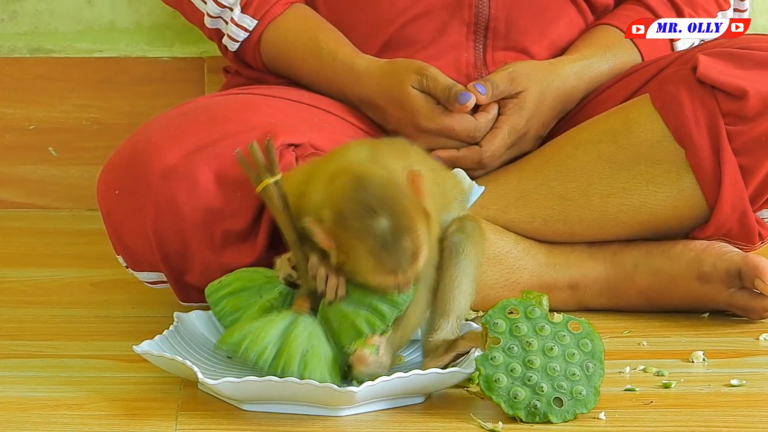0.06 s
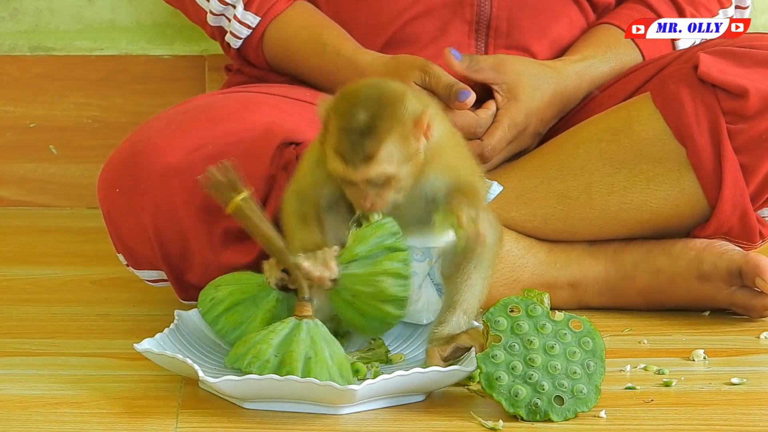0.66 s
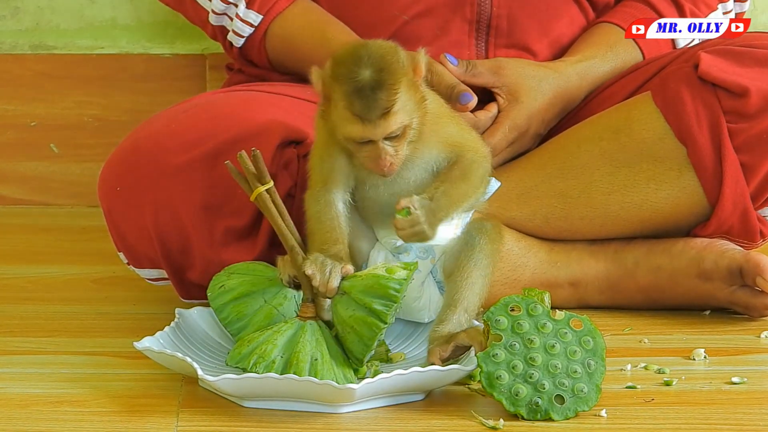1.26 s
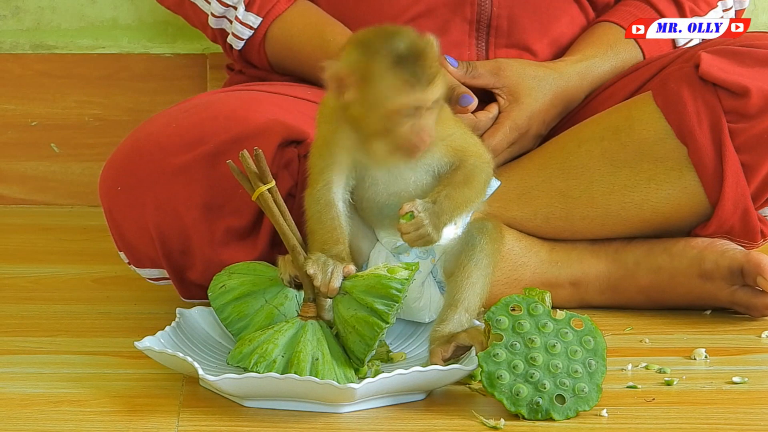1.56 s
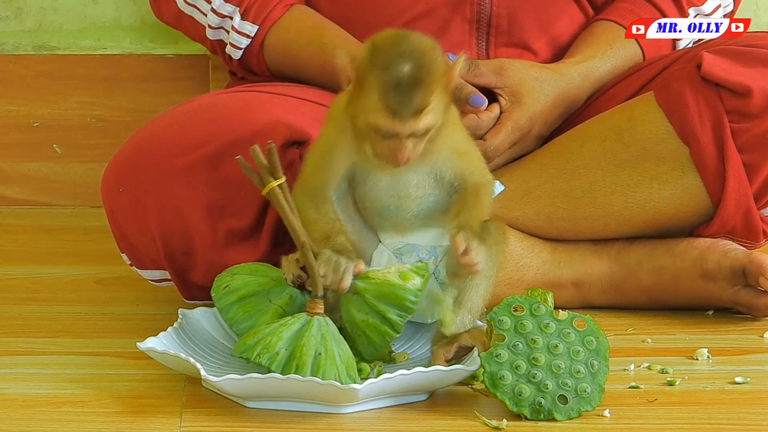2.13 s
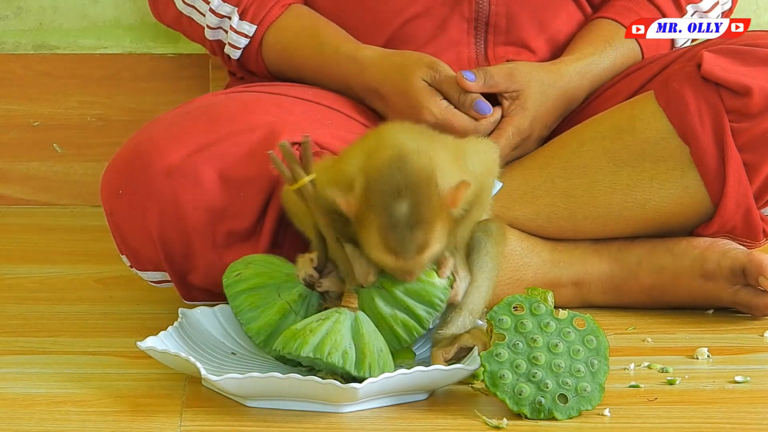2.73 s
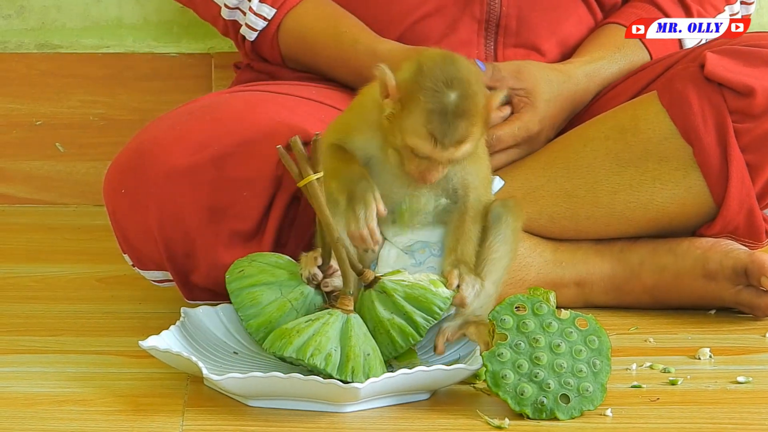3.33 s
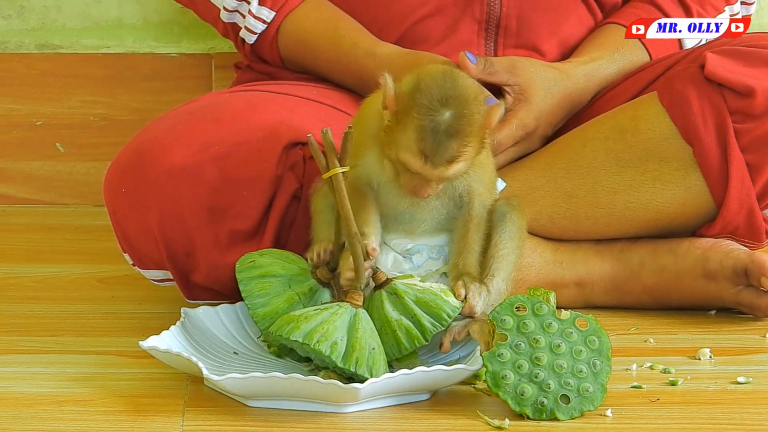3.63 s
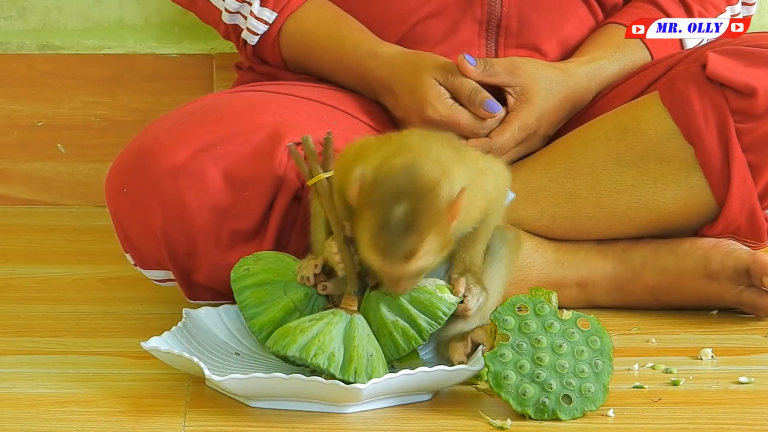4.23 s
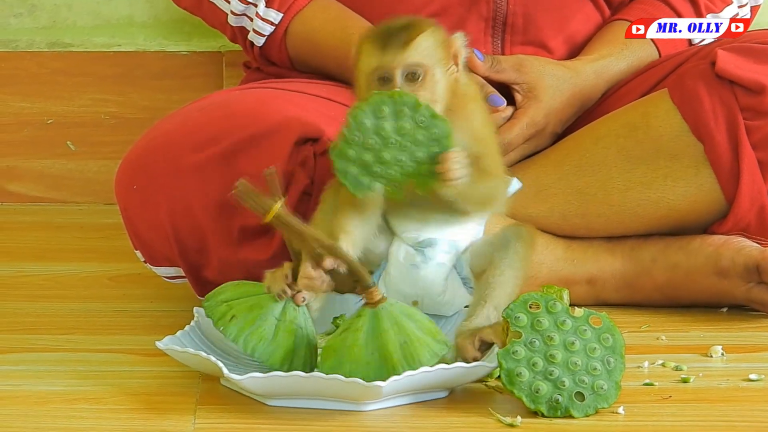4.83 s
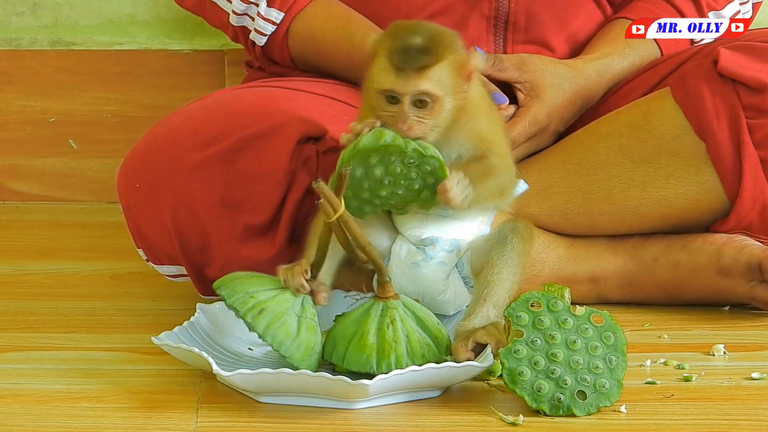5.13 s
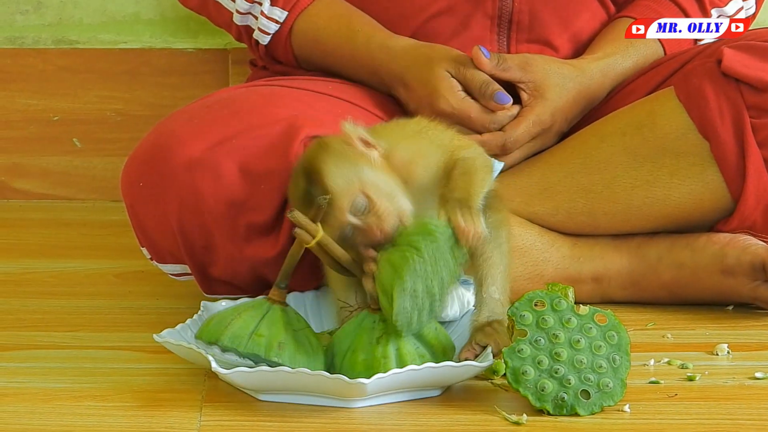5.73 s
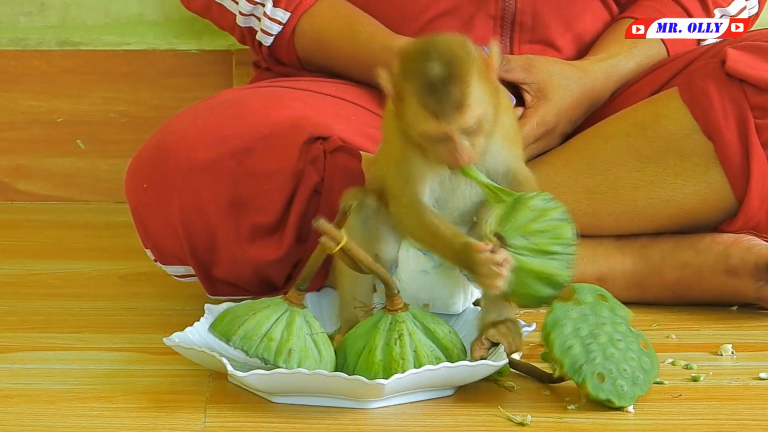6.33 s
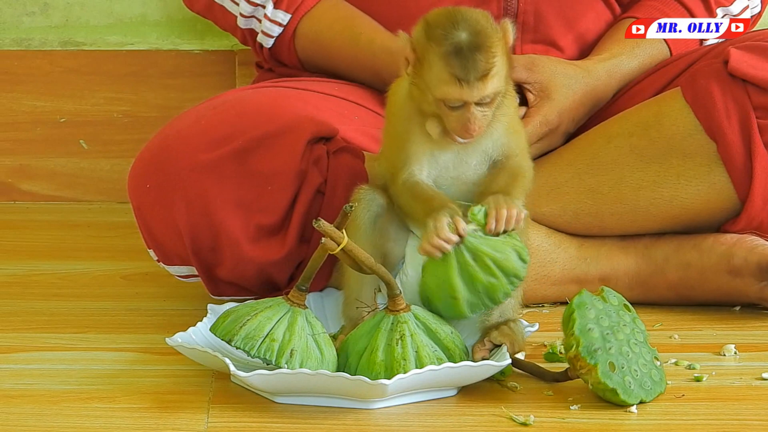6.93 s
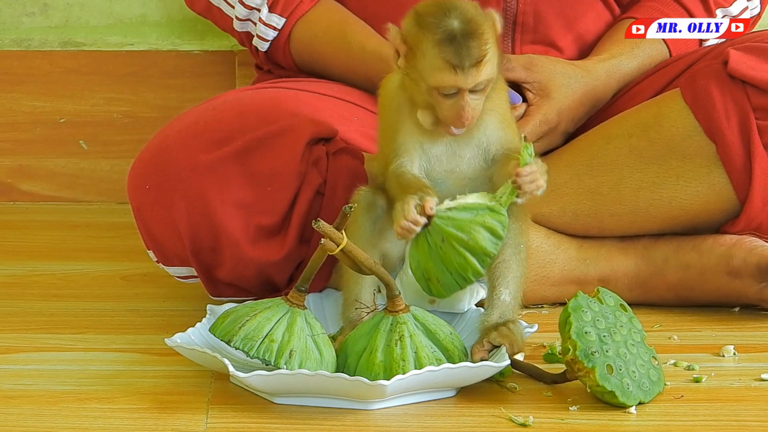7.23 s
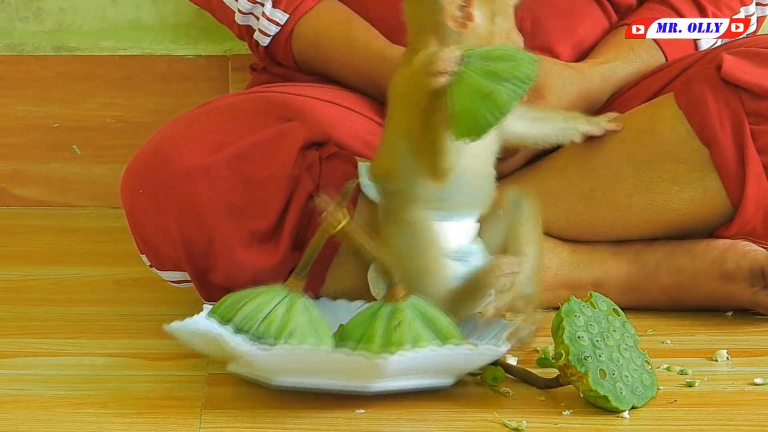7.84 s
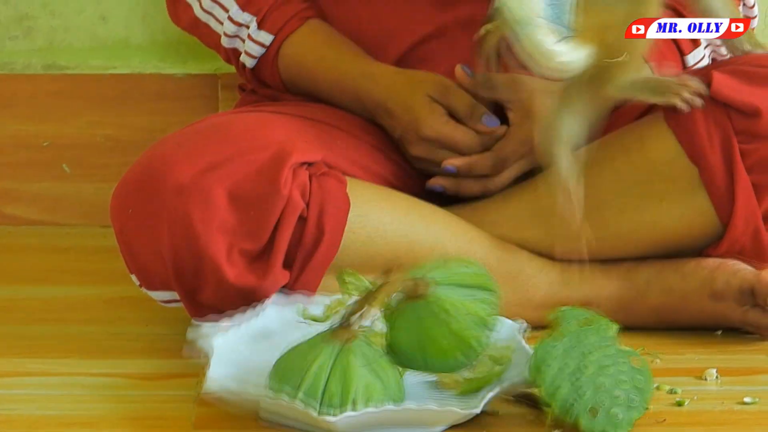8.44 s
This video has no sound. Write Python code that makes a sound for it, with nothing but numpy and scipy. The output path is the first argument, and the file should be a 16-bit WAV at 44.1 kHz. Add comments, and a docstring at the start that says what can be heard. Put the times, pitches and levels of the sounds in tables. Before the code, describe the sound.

A soft, steady rush fills a bare room, and every contact leaves a short echo. In the first second, seed pod husks snap and tear in small, crisp ticks, with light scrapes and taps of a hard plate on a wooden floor. After a pause, a knock and snap come at 2.3 seconds, and more tearing and tapping around 3. From 4.5 to 5.7 seconds pods drag, husks crack and the plate knocks several times. Louder snaps at 6.2 lead to a scrape and a firm knock at 6.4. Very faint, distant hoots fall slightly in pitch near 3.7 and 7 seconds. Light sliding follows, then the tipped plate is struck with a sharp, ringing clack at 8.2. It knocks, scrapes and lands with the loudest crack at 8.5 seconds, and the volume dips slightly afterwards.

```python
"""Monkey with seed pods on a plate

A small monkey tugs and bites at green seed pods on a hard plate, in a bare room with a wooden floor.
Husks snap and tear, pods drag, and the plate rocks and knocks on the boards. At last it tips up, is
struck while off the floor, and falls back. The room echoes, with a soft rush and faint, far-off hoots.
An automatic volume control turns the sound down after the loudest knocks and slowly recovers."""
import sys
import numpy as np
from scipy import signal
from scipy.fft import rfft, irfft, next_fast_len
from scipy.io import wavfile
from scipy.ndimage import uniform_filter1d

SR = 44100
rng = np.random.default_rng(int(sys.argv[2]) if len(sys.argv) > 2 else 0)


def transcribe(u):
    """Save the signal u as a 16-bit wav file named by the first command-line argument.

    u: samples, shape (n,) or (channels, n), limited to [-1, 1]; the rate is SR.
    q: integer samples, one column per channel.
    """
    v = np.clip(np.atleast_2d(u).T, -1, 1)
    q = np.round(v * 32767).astype(np.int16)
    wavfile.write(sys.argv[1], SR, q)


N = 378378

# The steady background rush, from bass to treble: pitch_hz, level_db
AIR_SPECTRUM = [(15, -56), (25, -37), (86, -9), (126, -13.5), (253, -4.5), (368, -6.5), (509, -6),
                (684, -7), (741, -6.5), (1240, -6.5), (1800, -9), (2920, -14.5), (6380, -17.5),
                (15500, -23)]
# Stereo width of that rush (lower means the two sides are more alike): pitch_hz, side_db
AIR_WIDTH = [(60, -16), (380, -14), (1290, -12), (2380, -6), (4400, -3), (15000, -1)]
# Stereo width of the echo: pitch_hz, side_db
ECHO_WIDTH = [(200, -20), (700, -20), (1290, -17), (2380, -12.5), (4400, -8), (8120, -3), (15000, -35)]
# How long the echo lasts (every "fade" here is the time to drop 60 dB): pitch_hz, fade_s
ECHO_FADE = [(200, 0.47), (550, 1.19), (1400, 0.93), (3700, 0.97), (7000, 0.91), (14000, 0.52)]
# Echo strength over the direct sound, before each source's own echo_db: pitch_hz, gain_db
ECHO_GAIN = [(150, 5.5), (500, 6.5), (1400, 5), (4000, 8.5), (12000, 7.5)]
# Faint, far-off hoots: start_s, length_s, first_hz, last_hz, level_db
HOOT_CALLS = [(3.7, .45, 522, 471, -72), (6.767, 0.169, 344.5, 292.6, -62),
              (7.045, 0.23, 308.5, 290, -69.5)]
# Notes the floorboards ring at: pitch_hz, width_hz, level_db
BOARD_NOTES = [(419, 41, -3.5), (426, 12, -1), (550, 61, -13.5), (660, 18, 1.5), (754, 16.3, 3),
               (770, 76, -1)]
# Notes of the plate's body: pitch_hz, width_hz, level_db
BODY_NOTES = [(1056, 143, 1.5), (1212, 51, 1), (1300, 52, 1), (1446, 18, -3), (1640, 390, -4),
              (1765, 175, -5.5)]
# Notes of the plate's rim: pitch_hz, width_hz, level_db
RIM_NOTES = [(2087, 53, 5), (2210, 27, -10), (2553, 46, -1.5), (2930, 180, -5.5), (3210, 200, -7),
             (3254, 290, -6), (3740, 78, -24)]
# Notes of the plate when it is off the floor: pitch_hz, width_hz, level_db
LIFTED_NOTES = [(1240, 126, -10), (1400, 50, -8), (1755, 71, -0.5), (1845, 94, -7.5), (2590, 110, -16.5),
                (3500, 156, -14.5), (4180, 42, -20), (5130, 260, -24.5)]
# Crowded notes of pods and boards, blurred into noise: pitch_hz, level_db
CLATTER_SPECTRUM = [(120, -12), (250, -2), (400, -4.5), (520, -2), (1300, -3), (3400, -4), (4600, -14),
                    (9000, -43), (15000, -18)]
# The bright crack of a knock: pitch_hz, level_db
CRACK_SPECTRUM = [(300, -46), (3000, -5), (4500, -12.5), (6500, 3), (8800, 2.5), (10500, -11), (16000, -37)]
# The tone of a breaking husk: pitch_hz, level_db
HUSK_SPECTRUM = [(300, 11), (1000, 7), (3000, 3.5), (8800, 3), (10500, -1), (16000, 9)]
# Pods and plate sliding: start_s, length_s, level_db, centre_hz
SLIDES = [(0.055, 0.087, -52, 1400), (0.344, 0.12, -59, 900), (0.696, 0.028, -46.5, 1400),
          (2.746, 0.03, -53, 670), (3.061, 0.034, -45.5, 900), (4.582, 0.4, -53.5, 1000),
          (5.02, 0.026, -44.5, 685), (5.204, 0.046, -53.5, 740), (6.385, 0.093, -36.5, 930),
          (7.454, 0.096, -53, 1000), (7.952, 0.25, -58, 1000), (8.264, 0.052, -37.5, 654),
          (8.411, 0.23, -29, 890)]
# A husk snaps, then tears on: start_s, snap_level_db, tear_length_s, high_edge_hz
HUSK_BREAKS = [(0.291, -36.5, 0.13, 11000), (0.637, -41.5, 0.015, 10900), (0.71, -39, .035, 12000),
               (0.733, -30.5, 0.015, 12100), (0.989, -36, 0.045, 12000), (2.328, -37.5, .015, 8000),
               (2.834, -45.5, 0.019, 3980), (3.063, -34, 0.062, 13000), (4.732, -41.5, 0.017, 6040),
               (4.757, -33, 0.033, 10000), (4.781, -27.5, 0.014, 13000), (5.033, -31, 0.035, 5100),
               (5.49, -31.5, 0.0086, 9300), (6.185, -28.5, 0.018, 7900), (6.224, -25, 0.052, 9000),
               (6.26, -30, 0.025, 10000)]
# Plate and pods knocking: start_s, level_db, low_edge_hz, high_edge_hz
PLATE_KNOCKS = [(0.106, -50.5, 1080, 1790), (0.734, -35.5, 450, 1880), (1.047, -40, 330, 1800),
                (2.329, -31, 1000, 1620), (3.007, -45, 900, 2200), (3.173, -36.5, 422, 3500),
                (4.51, -44.5, 600, 2320), (4.782, -26, 750, 1640), (4.825, -25.5, 340, 1400),
                (4.864, -28.5, 340, 2000), (5.634, -42.5, 400, 1120), (5.679, -24, 614, 2930),
                (6.26, -21, 800, 1770), (6.429, -12.5, 800, 5200), (7.759, -46, 850, 1750),
                (8.114, -41, 1400, 2040), (8.385, -19.5, 657, 1400), (8.501, -4.5, 1300, 14700)]


def amp(db):
    """Turn decibels into a number to multiply by."""
    return 10 ** (np.asarray(db) / 20)


def unit(x):
    """Scale a sound to an average power of 1."""
    return x / np.sqrt(np.mean(x ** 2) + 1e-20)


def at_level(x, db, length_s):
    """Give x the energy of a steady sound of this level and length."""
    return amp(db) * x / np.sqrt(np.sum(x ** 2) / (length_s * SR) + 1e-20)


def fade(t, fade_s):
    """A dying away that drops 60 dB every fade_s seconds."""
    return amp(-60 * t / fade_s)


def along(curve, hz):
    """Read a value between the rows of a (pitch_hz, value) table, on a musical pitch scale."""
    pitches, values = np.transpose(curve)
    return np.interp(np.log(hz + 1), np.log(pitches), values)


def filtered(x, response):
    """Multiply each frequency f in a sound by response(f)."""
    n = x.shape[-1]
    padded = next_fast_len(n + 8192)
    return irfft(rfft(x, padded) * response(np.fft.rfftfreq(padded, 1 / SR)), padded)[..., :n]


def coloured(x, spectrum):
    """Shape a sound's bass and treble with a (pitch_hz, level_db) table."""
    return filtered(x, lambda f: amp(along(spectrum, f)))


def resonance(f, hz, width_hz):
    """One ringing note: it passes its own pitch fully and others less."""
    return 1j * f * width_hz / (hz * hz - f * f + 1j * f * width_hz)


def ringing(x, notes, scatter_db):
    """Shake an object with x; each spot touched rings its notes with new strengths and signs."""
    gains = amp(scatter_db * rng.standard_normal(len(notes))) * rng.choice([-1, 1], len(notes))
    return filtered(x, lambda f: sum(gain * amp(db) * resonance(f, hz, width_hz)
                                     for gain, (hz, width_hz, db) in zip(gains, notes)))


def contact(x, low_hz, high_hz):
    """Trim bass and treble: a heavier blow reaches lower, a harder contact higher."""
    x = signal.sosfilt(signal.butter(2, low_hz, "high", fs=SR, output="sos"), x)
    return signal.sosfilt(signal.butter(3, high_hz, fs=SR, output="sos"), x)


def burst(t, spectrum, fade_s):
    """A puff of shaped noise that dies away."""
    return coloured(rng.standard_normal(len(t)), spectrum) * fade(t, fade_s)


def slips(length_s, per_s, spread_db):
    """Sticking and slipping makes a run of tiny, uneven clicks that swells and stops."""
    n = int(length_s * SR)
    slipping = rng.random(n) < per_s / SR
    clicks = slipping * rng.standard_normal(n) * amp(spread_db * rng.standard_normal(n))
    return np.pad(clicks * np.sqrt(np.hanning(n)), (0, SR // 20))


def stereo(middle, side, width):
    """Left and right, heard from two close points: most alike in the bass."""
    side = coloured(side, width)
    return np.array([middle + side, middle - side])


def add(track, start_s, sound):
    """Mix a sound into the track at its start time."""
    i = max(round(start_s * SR), 0)
    track[..., i:i + sound.shape[-1]] += sound[..., :max(N - i, 0)]


def room_tone(level_db=-54.5):
    """A steady background rush and hiss."""
    middle, side = coloured(rng.standard_normal((2, N)), AIR_SPECTRUM)
    return amp(level_db) * stereo(unit(middle), unit(side), AIR_WIDTH)


def in_room(sound, echo_db, build_s=0.0047, near_s=0.0048, near_db=-8):
    """Add a long echo off bare walls and a few quick bounces, new for each place of contact."""
    hz, t, noise = signal.stft(rng.standard_normal((2, int(0.75 * SR))), SR, nperseg=256)
    fade_s = along(ECHO_FADE, hz)[:, None]
    gain = amp(echo_db + along(ECHO_GAIN, hz))[:, None] * np.sqrt(2 * np.log(1000) / (fade_s * SR))
    tail = signal.istft(noise * gain * fade(t, fade_s), SR, nperseg=256)[1]
    tail *= 1 - np.exp(-(np.arange(tail.shape[1]) / SR / build_s) ** 2)
    room = stereo(*tail, ECHO_WIDTH)
    room[:, 0] += 1  # the direct sound
    bounces = (near_s * SR * rng.random(size=8)).astype(int)  # off the floor and bodies close by
    room[:, bounces] += amp(near_db) * rng.choice([-1, 1], len(bounces)) / np.sqrt(len(bounces))
    return signal.fftconvolve(sound[None], room, axes=1)


def hoots():
    """Soft, slightly falling tones from far away."""
    for start_s, length_s, first_hz, last_hz, db in HOOT_CALLS:
        n = int(length_s * SR)
        phase = 2 * np.pi * np.cumsum(np.linspace(first_hz, last_hz, n)) / SR
        tone = np.sin(phase) + 0.38 * np.sin(2 * phase)
        yield start_s, amp(db) * np.sqrt(np.hanning(n)) * tone


def scrapes(clatter_db=6, rustle_hz=4500):
    """Sliding shakes the boards and plate, lower for soft contacts, while the husk rustles."""
    for start_s, length_s, db, centre_hz in SLIDES:
        stroke = slips(length_s, per_s=1500, spread_db=5)
        ring = unit(ringing(stroke, BOARD_NOTES + BODY_NOTES + RIM_NOTES, scatter_db=4))
        clatter = amp(clatter_db) * unit(coloured(stroke, CLATTER_SPECTRUM))
        rub = filtered(ring + clatter, lambda f: resonance(f, centre_hz, 1.04 * centre_hz))
        husk_clicks = slips(length_s, per_s=4000, spread_db=1.5)
        rustle = filtered(husk_clicks, lambda f: resonance(f, rustle_hz, 2.3 * rustle_hz))
        rustle_db = -23.5 + 0.68 * db  # a louder slide rustles more
        yield start_s, at_level(rub, db, length_s) + at_level(rustle, rustle_db, length_s)


def tears(snap_fade_s=0.0096, snap_rise_s=0.0014, tear_db=-16, low_hz=900):
    """The husk gives way with a bright tick, then a quick run of smaller fibres breaks."""
    t = np.arange(SR // 20) / SR
    for start_s, db, length_s, high_hz in HUSK_BREAKS:
        tick = rng.standard_normal(len(t)) * fade(t, snap_fade_s) * (1 - np.exp(-t / snap_rise_s))
        fibres = slips(length_s, per_s=3900, spread_db=4)
        snap = contact(coloured(tick, HUSK_SPECTRUM), low_hz, high_hz)
        tear = contact(coloured(fibres, HUSK_SPECTRUM), low_hz, high_hz)
        yield start_s, at_level(snap, db, length_s=0.002)
        yield start_s, at_level(tear, db + tear_db, length_s)


def knocks(chatter=0.19, rise_s=0.0013):
    """A short, chattering blow rings boards and plate; pods lying on the plate soon hush it."""
    t = np.arange(SR // 8) / SR
    for start_s, db, low_hz, high_hz in PLATE_KNOCKS:
        blow = chatter * rng.standard_normal(len(t)) * fade(t, fade_s=0.01)
        blow[0] += 1  # the first hit
        thud = ringing(blow, BOARD_NOTES, scatter_db=1.5) * fade(t, fade_s=0.03)
        body = ringing(blow, BODY_NOTES, scatter_db=1) * fade(t, fade_s=0.034)
        rim = ringing(blow, RIM_NOTES, scatter_db=1) * fade(t, fade_s=0.079)
        clatter = burst(t, CLATTER_SPECTRUM, fade_s=0.023)
        crack = burst(t, CRACK_SPECTRUM, fade_s=0.035)
        ring_db = 0.28 * db  # light touches leave the plate almost still
        parts = [(thud, 0), (body, 1.5 + ring_db), (rim, 2 + ring_db), (clatter, 1), (crack, -6)]
        knock = sum(amp(share_db) * unit(part) for part, share_db in parts)
        knock *= 1 - np.exp(-t / rise_s)
        yield start_s, at_level(contact(knock, low_hz, high_hz), db, length_s=0.0086)


def tipped_plate(level_db=-9.5, crack_db=-23.5, clatter_db=-9, noise_fade_s=0.015, rise_s=0.0002):
    """Lifted off the boards, the struck plate rings higher, with little thud."""
    t = np.arange(SR // 8) / SR
    tap = 1.0 * (t == 0)
    ring = ringing(tap, LIFTED_NOTES, scatter_db=3) * fade(t, fade_s=0.087)
    crack = amp(crack_db) * unit(burst(t, CRACK_SPECTRUM, noise_fade_s))
    clatter = amp(clatter_db) * unit(burst(t, CLATTER_SPECTRUM, noise_fade_s))
    blow = unit(ring) + contact(crack + clatter, low_hz=1000, high_hz=13000)
    return at_level(blow * (1 - np.exp(-t / rise_s)), level_db, length_s=0.0059)


def scene(left_lead_s=0.000018):
    """Everything sounds in one room, over its background, and reaches the left side just first."""
    mix = room_tone()
    for source, echo_db in [(knocks, 0.5), (tears, -3), (scrapes, 0), (hoots, 7)]:
        for start_s, sound in source():
            add(mix, start_s, in_room(sound, echo_db))
    add(mix, start_s=8.1645, sound=in_room(tipped_plate(), echo_db=-2))
    return filtered(mix, lambda f: np.exp(1j * np.pi * left_lead_s * np.array([f, -f])))


def record(dry, threshold_db=-15, drop_s=0.042, recovery_db_per_s=5, top_hz=15850):
    """The volume drops fast after loud knocks and creeps back; peaks round off; top treble is cut."""
    power = uniform_filter1d(np.mean(dry ** 2, axis=0), size=220)  # averaged over 5 ms
    level_db = 10 * np.log10(np.abs(power) + 1e-12)
    excess_db = np.maximum(level_db - threshold_db, 0)
    recovery_db = recovery_db_per_s * np.arange(N) / SR
    cut_db = np.maximum.accumulate(excess_db + recovery_db) - recovery_db  # each cut slowly lets go
    step = 1 / (drop_s * SR)
    smooth_cut_db = signal.lfilter([step], [1, step - 1], cut_db)
    lowered = dry * amp(-smooth_cut_db)
    rounded = lowered / (1 + lowered ** 4) ** (1 / 4)
    return filtered(rounded, lambda f: f < top_hz)


dry = scene()
out = record(dry)
transcribe(out)
```